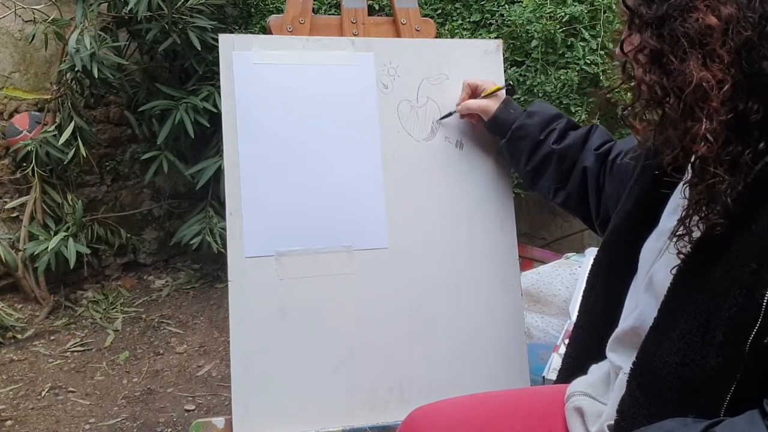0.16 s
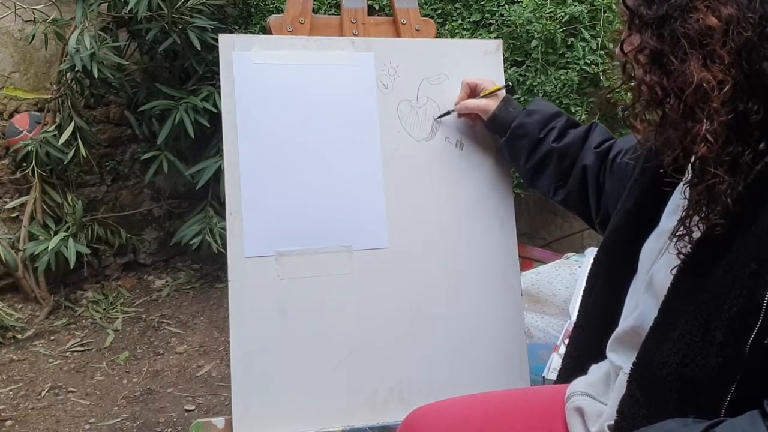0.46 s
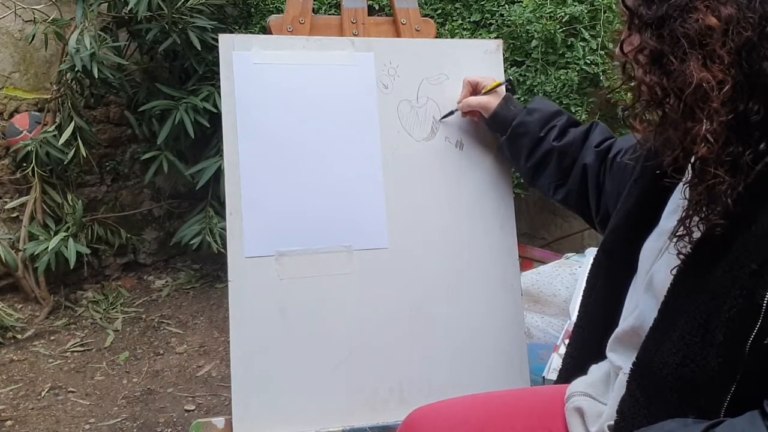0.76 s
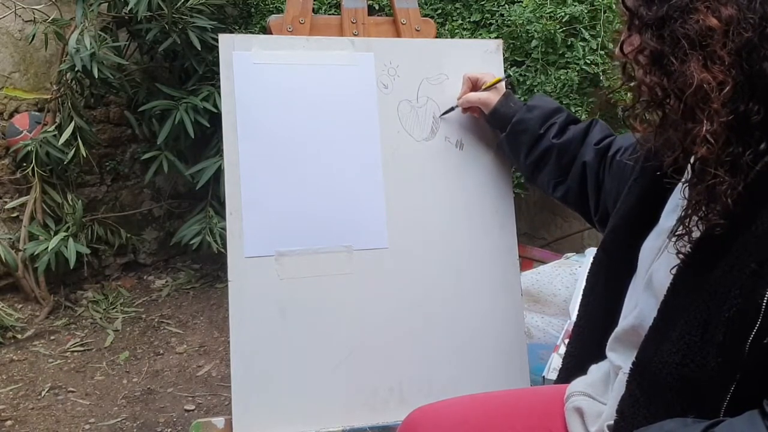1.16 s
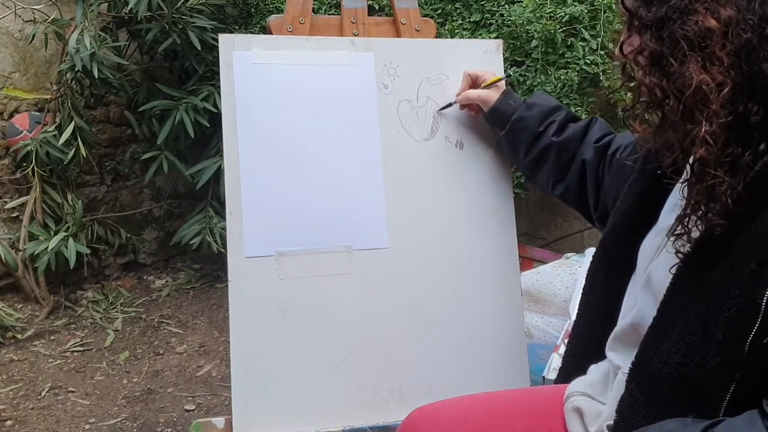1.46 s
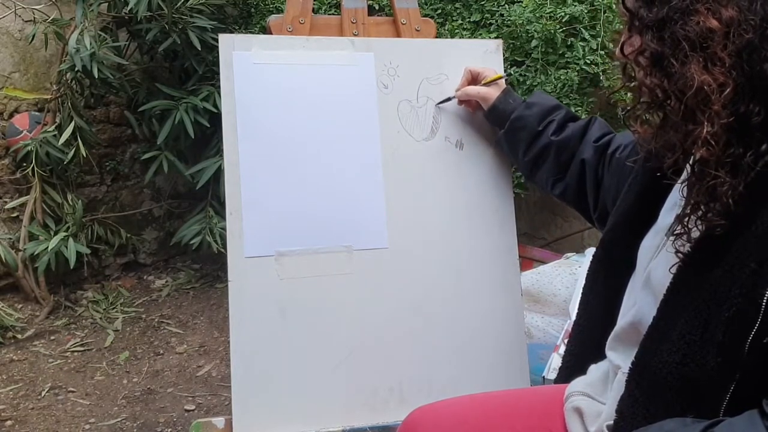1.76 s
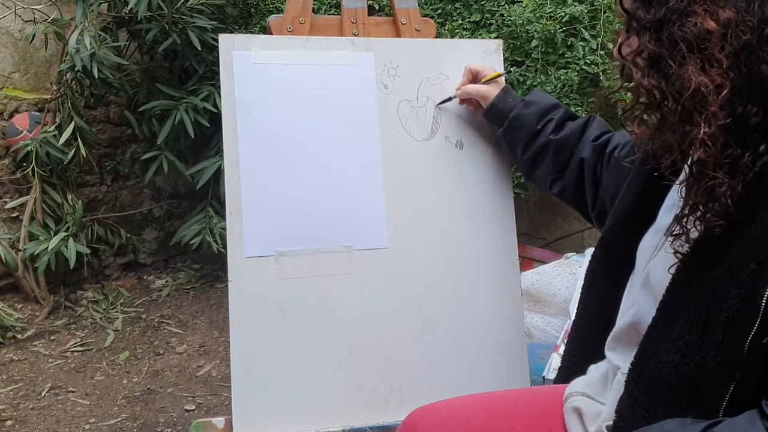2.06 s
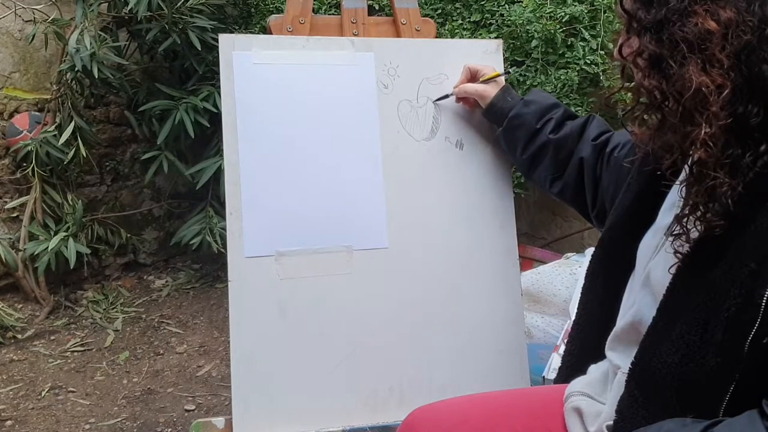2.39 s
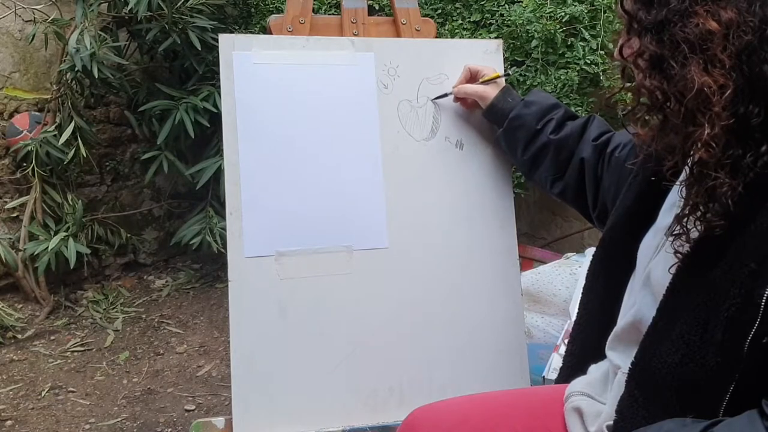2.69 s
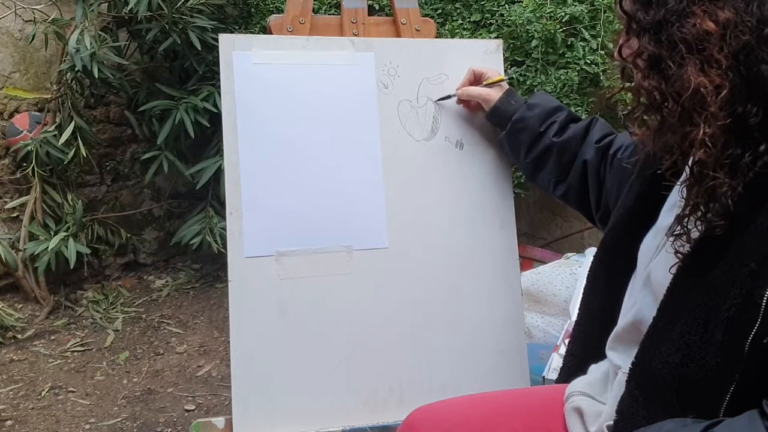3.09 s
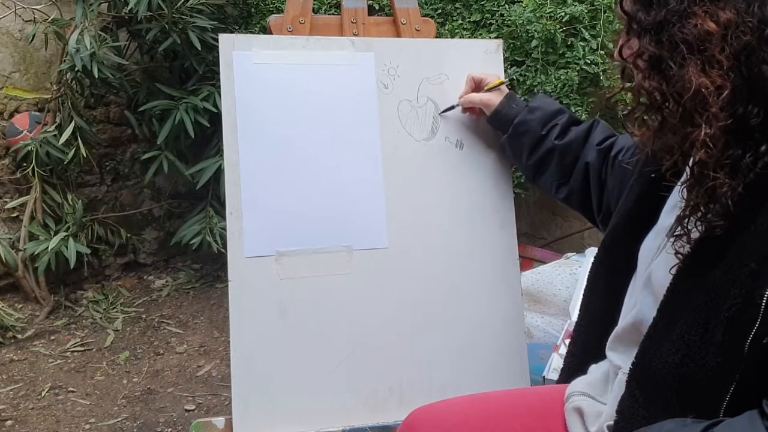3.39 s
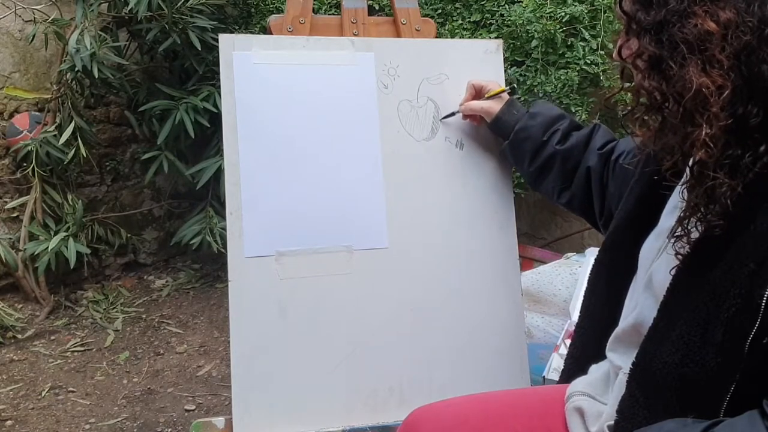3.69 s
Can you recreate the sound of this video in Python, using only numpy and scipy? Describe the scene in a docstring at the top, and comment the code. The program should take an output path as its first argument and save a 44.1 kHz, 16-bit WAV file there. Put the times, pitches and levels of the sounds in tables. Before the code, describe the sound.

Pencil shading on paper in quick short scratchy strokes, over a low distant traffic rumble outdoors

```python
"""A pencil shades back and forth on paper on an easel board, in a garden: about ten short strokes a second,
lighter in the middle, with a few ticks of the lead. Noise makes the strokes, swelling with the pencil's speed;
short noise bursts make the ticks. Behind them distant traffic rumbles (low noise) and one engine drones in it
(a wandering sine). A narrow steady hiss sits on the left, over faint microphone noise on both sides."""
import sys
import numpy as np
from scipy import signal
from scipy.fft import rfft, irfft, next_fast_len
from scipy.io import wavfile
from scipy.ndimage import uniform_filter1d, map_coordinates

SR = 44100
rng = np.random.default_rng(int(sys.argv[2]) if len(sys.argv) > 2 else 0)


def wav_out(sig):
    """Save sig, one row per channel (or a flat mono array), as 16-bit PCM at SR to the path in sys.argv[1]."""
    wavfile.write(sys.argv[1], SR, np.round(np.clip(np.atleast_2d(sig).T, -1, 1) * 32767).astype(np.int16))


N = 169785  # length in samples

# Pencil strokes, levels before the trims below: [middle t/s, length t/s, fine hiss level/dB,
# coarser scrape level/dB, brightness of the hiss level/dB, pencil's ring level/dB]
STROKES = [(0.01, 0.03, -67, -70.5, -1.0, -97), (0.089, 0.067, -68, -78, 1, -84),
           (0.208, 0.066, -72.5, -81, 2.0, -84), (0.295, 0.061, -69.5, -76, 2, -95),
           (0.404, 0.085, -71.5, -79, 1.0, -95), (0.505, 0.076, -74, -79.5, 2.0, -97),
           (0.615, 0.068, -72, -75.5, -1.0, -87), (0.71, 0.07, -72, -80.5, 2, -97),
           (0.826, 0.059, -70, -76, 2, -91), (0.919, 0.068, -70.5, -77.5, 2, -94),
           (1.036, 0.08, -72, -75.5, -0.0, -90), (1.112, 0.067, -73, -79, 3, -89),
           (1.221, 0.062, -72.5, -78, 0.0, -87), (1.3, 0.065, -74, -84, 0, -86),
           (1.411, 0.05, -69.5, -76, -4.0, -87), (1.488, 0.06, -71.5, -78.5, -2, -90),
           (1.592, 0.067, -72.5, -78, -1, -92), (1.676, 0.065, -75, -79.5, 2.0, -94),
           (1.785, 0.048, -72, -78, -1, -81), (1.853, 0.045, -74, -79.5, -1, -88),
           (1.967, 0.053, -75.5, -81, -1.0, -82), (2.04, 0.05, -79, -84, 2.0, -94),
           (2.137, 0.06, -81, -84, 1, -96), (2.208, 0.05, -80, -84, 4.0, -93),
           (2.31, 0.043, -84, -87, -1, -97), (2.373, 0.071, -80, -85, 4.0, -97),
           (2.523, 0.039, -85, -83, 3.0, -97), (2.603, 0.046, -94, -88, 5, -102),
           (2.93, 0.084, -78, -82.5, 0, -91), (3.025, 0.053, -77.5, -81, -1.0, -91),
           (3.175, 0.075, -79.5, -87, -0.0, -97), (3.282, 0.06, -79, -85, 0, -97),
           (3.378, 0.061, -71.5, -79, 4, -89), (3.522, 0.12, -72, -79, 2.0, -88),
           (3.64, 0.035, -76, -84, 1.0, -97), (3.727, 0.075, -72.5, -80, 4, -97)]
# Graphite sliding: [f/Hz, left level/dB, right level/dB]
HISS = [(8100, -16.5, -22), (8860, -10, -27), (9460, -7.5, -28), (10100, -2.5, -15), (11200, 0, -5.5),
        (12600, -4.5, -15), (13500, -18, -17), (14400, -12, -19), (15500, -9, -12)]
# Paper and the pencil under it: [f/Hz, left level/dB, right level/dB]
SCRAPE = [(2980, -4.5, -11), (3700, -2.5, -5), (4270, -2, -2), (5240, -7.5, -6.5), (5700, -4.5, -4.5),
          (6340, -3.5, -9), (6900, -7, -3), (8100, -10.5, -16)]
# The board's dull rub: [f/Hz, left level/dB, right level/dB]
BOARD = [(298, -37, -25), (696, -0.5, 6), (1180, 1.5, 0), (1800, -2, -19), (2980, -17, -17)]
HISS_DB, SCRAPE_DB, BOARD_DB, RING_DB = -0.5, -1, 11, 3.5  # trims; the board follows the scrape's level
RISE_SHARE = 0.48  # part of a stroke spent speeding up
STROKE_CURVE = 0.94  # loudness as a power of speed
OVERHANG = 1.79  # whole travel of a stroke over its listed length
BRIGHT_HZ, BRIGHT_WIDTH_HZ = 11440, 250  # the fine hiss tips about this frequency
BRIGHTENS_DB = 5  # the hiss grows brighter from the start of a stroke to its end
RING_HZ, RING_WIDTH_HZ, RING_RIGHT_DB = 5660, 170, -20  # a resonance of the pencil, weaker on the right


def pencil():
    """Each stroke speeds up and slows to the turn; its speed drives hiss, scrape, the pencil's ring and the board."""
    t = np.arange(N) / SR
    levels = np.zeros((4, N))
    for middle, length, hiss_db, scrape_db, bright_db, ring_db in STROKES:
        travel = (t - middle) / (OVERHANG * length) + .5  # 0 at the start, 1 at the turn
        on = (travel > 0) & (travel < 1)
        half_turn = np.interp(travel[on], [0, RISE_SHARE, 1], [0, .5, 1])
        speed = np.abs(np.sin(np.pi * half_turn))
        force = speed ** STROKE_CURVE
        # half the brightness lifts the treble, half lowers the rest
        tilt = amp((bright_db + BRIGHTENS_DB * (travel[on] - .5)) / 2)
        fine = amp(hiss_db) * force
        parts = [fine / tilt, fine * tilt, amp(scrape_db) * force, amp(ring_db) * force]
        levels[:, on] = np.hypot(levels[:, on], parts)  # overlapping strokes add in power
    lower_level, upper_level, scrape_level, ring_level = levels

    hiss = friction(HISS)
    upper = filtered(hiss, lambda hz: .5 + .5 * np.tanh((hz - BRIGHT_HZ) / BRIGHT_WIDTH_HZ))
    lower = hiss - upper
    sliding = amp(HISS_DB) * (lower_level * lower + upper_level * upper)
    rub = amp(SCRAPE_DB) * friction(SCRAPE) + amp(BOARD_DB) * friction(BOARD)
    ring = amp(RING_DB) * ring_level * pencil_ring()
    return sliding + scrape_level * rub + ring


def pencil_ring():
    """Noise through one narrow resonance: the pencil itself ringing."""
    def resonance(hz):
        """A single resonant peak, with gain 1 at its top."""
        damping = 1j * hz * RING_WIDTH_HZ
        return damping / (RING_HZ ** 2 - hz ** 2 + damping)
    return unit(filtered(white(), resonance)) * amp([[0], [RING_RIGHT_DB]])


GRAINS_PER_S, GRAIN_SPREAD_DB = 3500, 1  # paper fibres that catch the lead, and how uneven they are
GRAIN_SHARE = 0.56  # part of the power that comes from these catches


def friction(points):
    """Smooth sliding plus tiny slips of uneven size on the paper's fibres."""
    catches = rng.random(N) < GRAINS_PER_S / SR
    sizes = amp(GRAIN_SPREAD_DB * np.minimum(rng.exponential(size=N), 4))
    slips = unit(catches * sizes * white())
    mixed = np.sqrt(GRAIN_SHARE) * slips + np.sqrt(1 - GRAIN_SHARE) * white()
    return coloured(patchy(mixed), points)


PATCHY_DB = 1.5  # rms spread of the patches


def patchy(x):
    """x with patches of random gain, some hundred Hz wide and a few tens of ms long."""
    spectrum = signal.stft(x, nperseg=512)[2]
    field = rng.standard_normal(spectrum.shape)
    field = uniform_filter1d(field, size=4, axis=1)  # smooth over frequency
    field = uniform_filter1d(field, size=8, axis=2)  # smooth over time
    return signal.istft(spectrum * amp(PATCHY_DB * unit(field)), nperseg=512)[1][:, :N]


# The lead lands or catches: [t/s, level/dB, lower ring over the click level/dB]
TICKS = [(.8395, -73, 3), (.842, -72.5, 6.5), (1.3975, -60, -19), (1.400, -63, -19), (1.4165, -66, -13),
         (1.4205, -69, -6), (3.461, -64, -5), (3.464, -57, -8.5), (3.4705, -74, -6)]
# The lower ring of a tick: [f/Hz, left level/dB, right level/dB]
TICK_RING = [(3300, -14, -15), (4200, 2, 4), (5700, 2, -4), (6800, -3, -5), (8000, -14, -16)]
TICK_ATTACK_S, TICK_T60_S = 0.00026, 0.016  # T60: time to fall by 60 dB
TICK_TAIL_DB, TICK_TAIL_T60_S = -8.5, 0.2  # the paper and board ring on after a tick


def ticks():
    """The lead snaps against the paper: a very short click, then a lower ring that lasts longer."""
    high = coloured(white(), HISS)
    low = coloured(white(), TICK_RING)
    out = np.zeros((2, N))
    for start, level_db, low_db in TICKS:
        age = np.maximum(np.arange(N) / SR - start, 0)
        attack = 1 - np.exp(-age / TICK_ATTACK_S)
        click = amp(-60 * age / TICK_T60_S)
        tail = amp(TICK_TAIL_DB - 60 * age / TICK_TAIL_T60_S)
        ring = amp(low_db) * np.hypot(click, tail) * low
        out += amp(level_db) * attack * (click * high + ring)
    return out


# The narrow hiss on the left: [f/Hz, level/dB]
WHINE = [(1500, -45), (1900, -23), (2080, -6.5), (2160, -7), (2265, 3), (2345, 0.3), (2440, -7),
         (2600, -11.5), (2750, -26.5), (3200, -62)]
# Microphone hiss: [f/Hz, left level/dB, right level/dB]
FLOOR = [(3000, -0.5, -2.5), (4500, -4.5, -5), (6550, -8, -9), (8400, -10, -12), (9800, -4, -11.5),
         (11000, 1.5, -1.5), (12700, -1.5, -4.5), (15700, -1, -2.5)]
WHINE_DB, FLOOR_DB = -65.5, -78


def steady_hiss():
    """A narrow band of hiss on the left, over faint microphone noise on both sides."""
    narrow = coloured(rng.standard_normal(N), WHINE) * np.array([[1], [0]])
    return amp(WHINE_DB) * narrow + amp(FLOOR_DB) * coloured(white(), FLOOR)


# Loudness of the engine over time, before its trim and pan: [t/s, level/dB]
DRONE = [(0, -46), (.43, -51.5), (.55, -41), (.78, -45), (.94, -39.5), (1.12, -41.5), (1.33, -57),
         (1.59, -40), (1.88, -51.5), (2.25, -46.5), (2.6, -56), (3.05, -49.5), (3.4, -46), (3.85, -57)]
DRONE_HZ, DRONE_WANDER_HZ = 67.3, 0.85
DRONE_DB, DRONE_PAN_DB = -3, 1  # trim; left up and right down by the pan


def drone():
    """The low firing note of a distant engine: a sine wandering a little in pitch."""
    level_db = np.interp(np.arange(N) / SR, *np.transpose(DRONE)) + DRONE_DB
    pitch_hz = DRONE_HZ + DRONE_WANDER_HZ * wobble(6.96)
    note = np.sqrt(2) * np.sin(2 * np.pi * np.cumsum(pitch_hz) / SR)
    return note * amp(level_db) * amp([[DRONE_PAN_DB], [-DRONE_PAN_DB]])


# Traffic spectrum: [f/Hz, left level/dB, right level/dB]
RUMBLE = [(26, -29, -15), (33.3, -19, -28.5), (42.2, 0.5, -0.5), (57, 0.5, -2), (83.5, -7, -6.5),
          (104, -5, -8.5), (140, -12.5, -15.5), (191, -11.5, -12), (356, -16, -19.5), (604, -19, -23),
          (987, -28, -32.5), (1530, -34, -41.5), (1980, -39.5, -50.5), (2890, -55.5, -55)]
# How alike left and right are: [f/Hz, likeness from -1 (opposite) to 1 (the same)]
ALIKE = [(60, 1), (110, 0.93), (200, 0.87), (380, 0.8), (700, 0.27), (1290, -0.27), (2400, -0.049)]
RUMBLE_DB = -45


def traffic():
    """A far, steady rumble, nearly mono in the bass."""
    def shares(hz):
        """Gains of middle and side that give the wanted likeness."""
        angle = np.arccos(np.clip(along(ALIKE, hz)[0], -1, 1)) / 2
        return np.array([np.cos(angle), np.sin(angle)])
    mid, side = filtered(white(), shares)
    return amp(RUMBLE_DB) * coloured(np.array([mid + side, mid - side]), RUMBLE)


def white():
    """Unrelated noise for the two microphones."""
    return rng.standard_normal((2, N))


def wobble(rate):
    """A smooth random curve, rate knots a second."""
    knots = rng.standard_normal(int(N * rate / SR) + 4)
    return map_coordinates(knots, [np.arange(N) * rate / SR])


def coloured(x, points):
    """x with the given spectrum, at rms 1."""
    return unit(filtered(x, lambda hz: band(points, hz)))


def filtered(x, response):
    """x times a response of frequency."""
    m = next_fast_len(N + SR // 2)  # spare room so the end does not wrap to the start
    hz = np.fft.rfftfreq(m, 1 / SR)
    return irfft(rfft(x, m) * response(hz), m)[..., :N]


def band(points, hz):
    """Gains of a spectrum that falls by a further 60 dB an octave beyond its ends."""
    nearest = np.clip(hz, points[0][0], points[-1][0])
    octaves_out = np.abs(np.log2((hz + 1) / (nearest + 1)))
    return amp(along(points, hz) - 60 * octaves_out)


def along(points, hz):
    """Each column after the first, read between its points on a log frequency axis."""
    f, *cols = np.transpose(points)
    return np.array([np.interp(np.log(hz + 1), np.log(f + 1), c) for c in cols])


def amp(db):
    """Decibels to gain."""
    return 10 ** (np.asarray(db) / 20)


def unit(x):
    """Scaled to rms 1."""
    return x / np.sqrt(np.mean(x ** 2) + 1e-20)


def scene():
    """The pencil in front of the outdoor background."""
    return pencil() + ticks() + steady_hiss() + drone() + traffic()


TOP_HZ = 15750


def record(dry):
    """Nothing is kept above the band limit."""
    return filtered(dry, lambda hz: hz < TOP_HZ)


dry = scene()
out = record(dry)
wav_out(out)
```